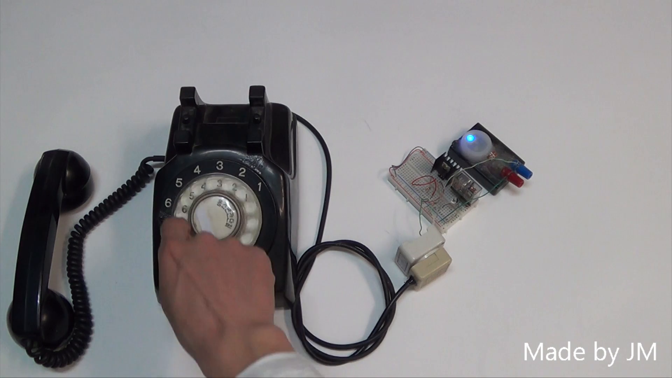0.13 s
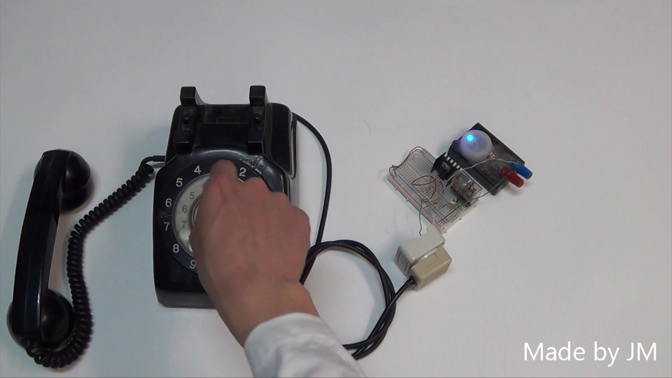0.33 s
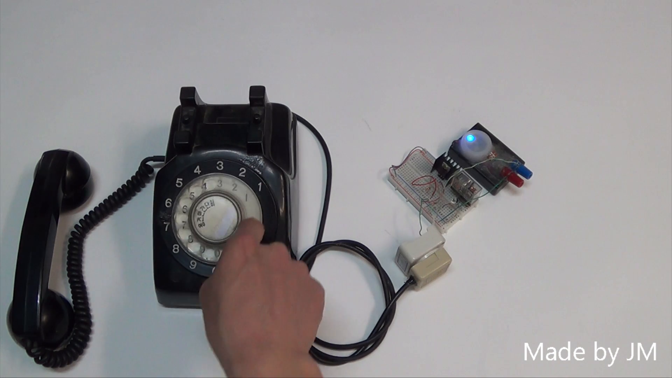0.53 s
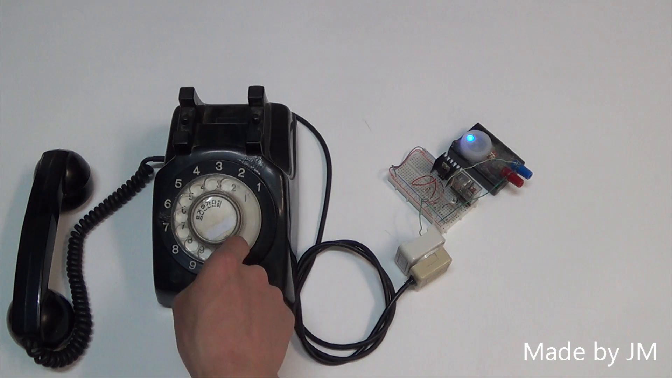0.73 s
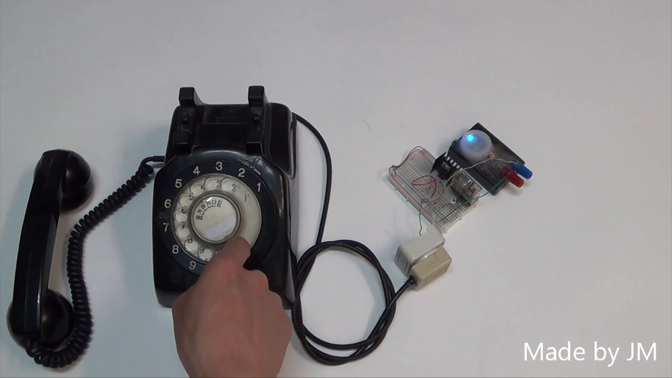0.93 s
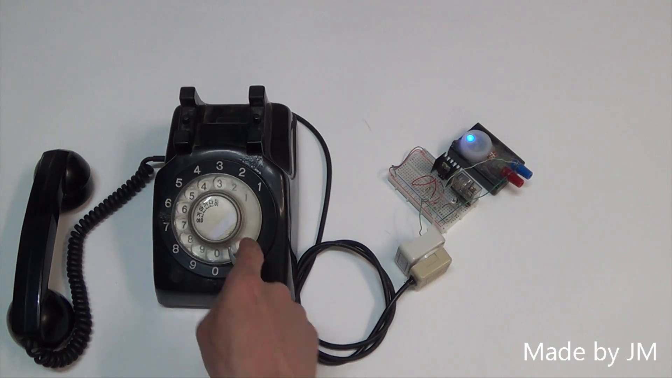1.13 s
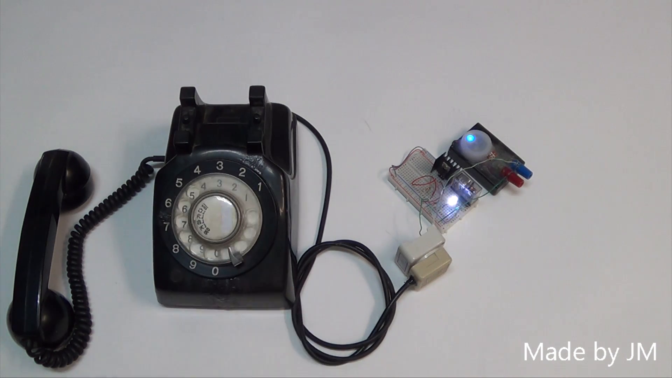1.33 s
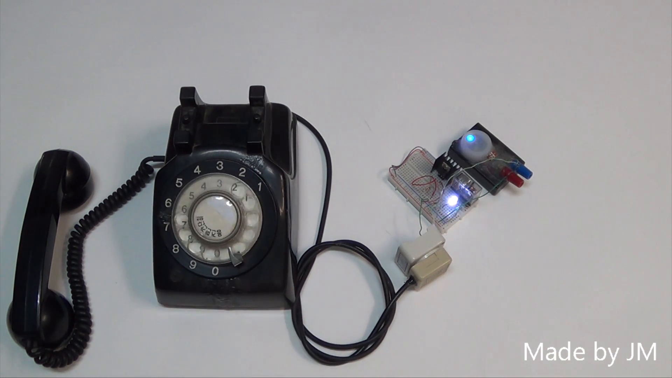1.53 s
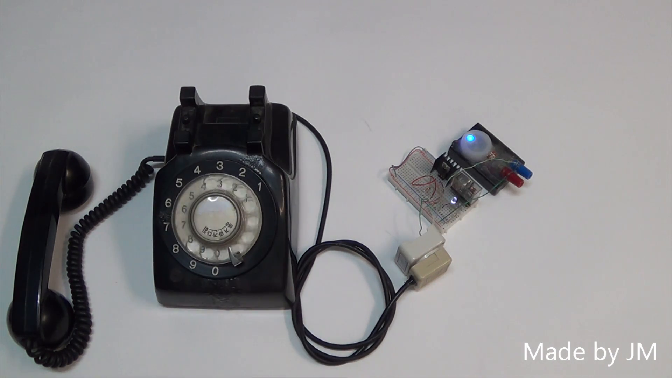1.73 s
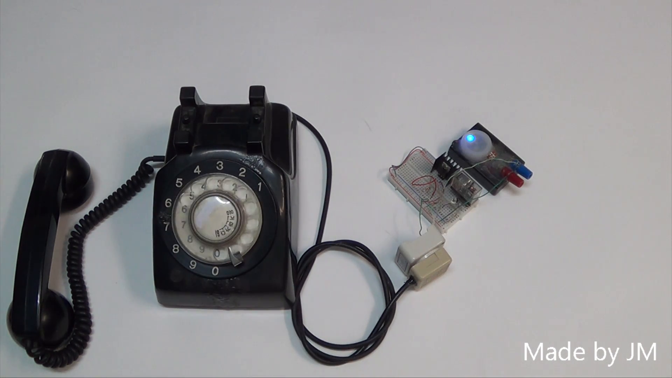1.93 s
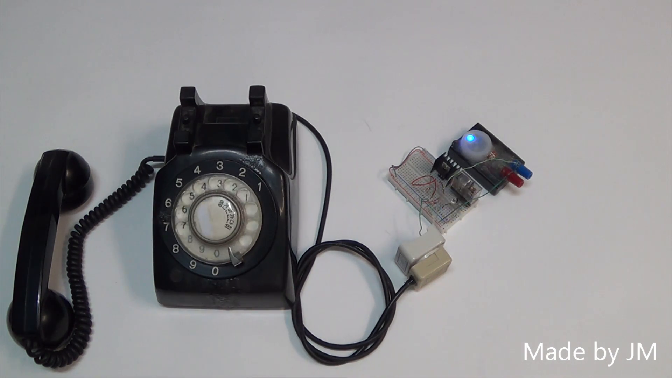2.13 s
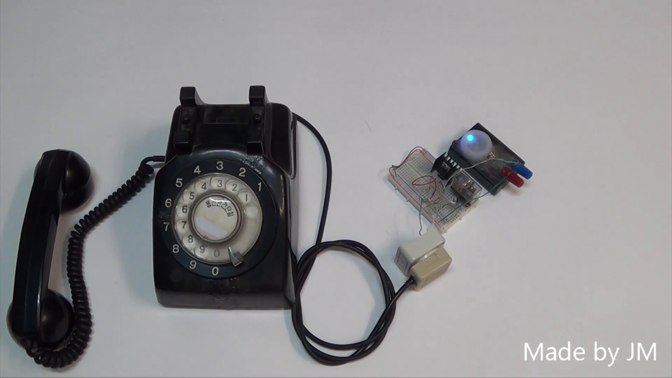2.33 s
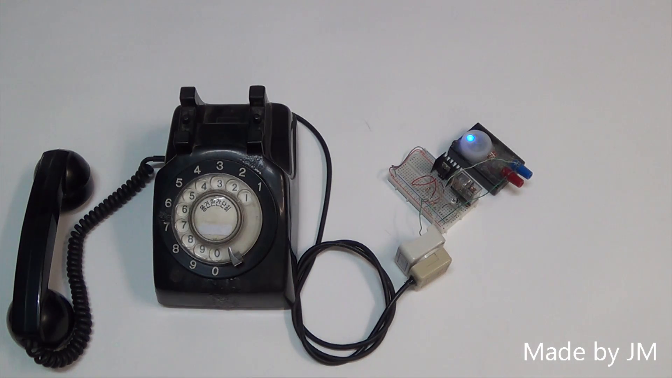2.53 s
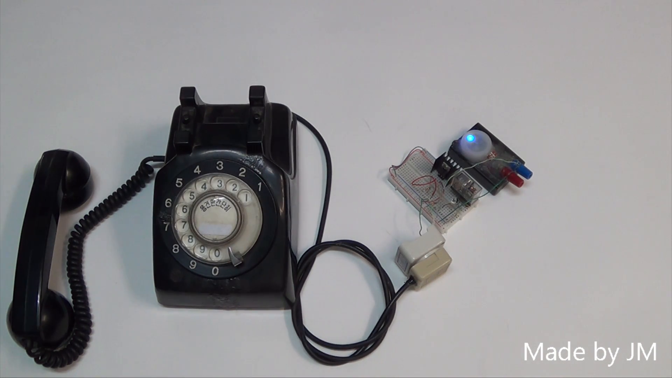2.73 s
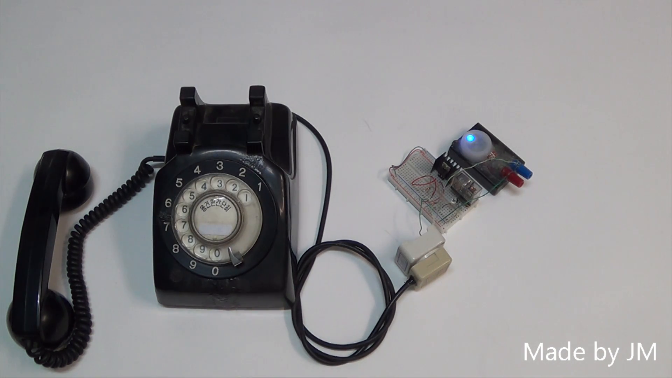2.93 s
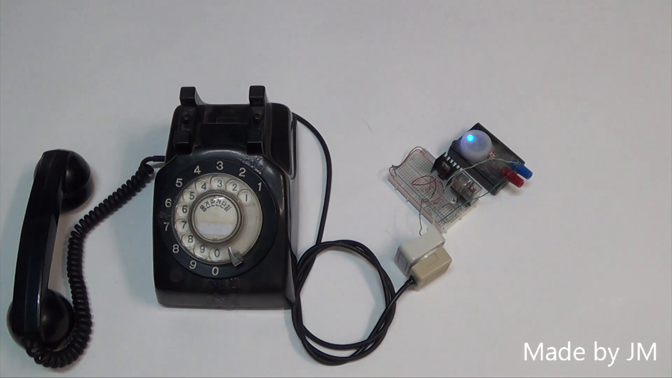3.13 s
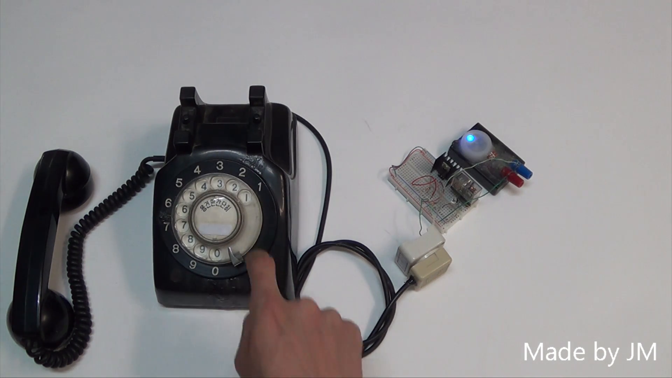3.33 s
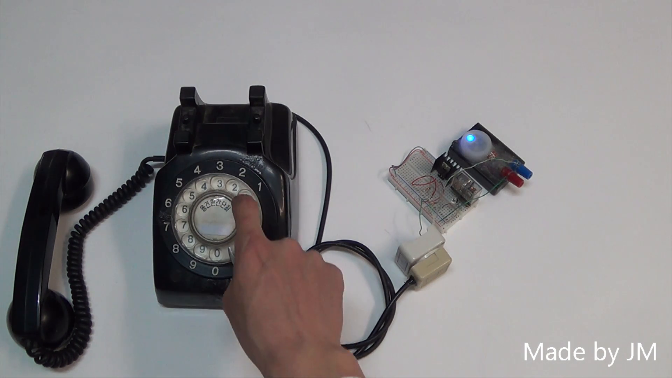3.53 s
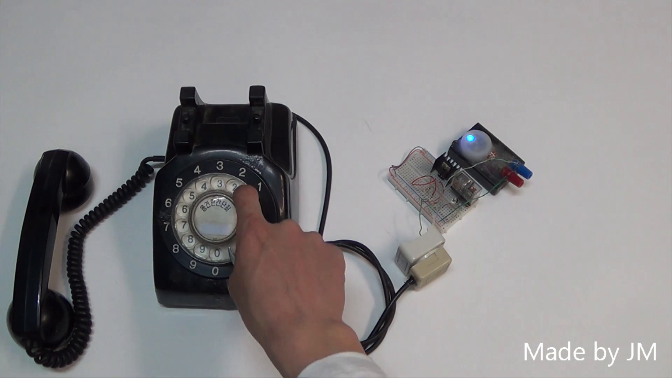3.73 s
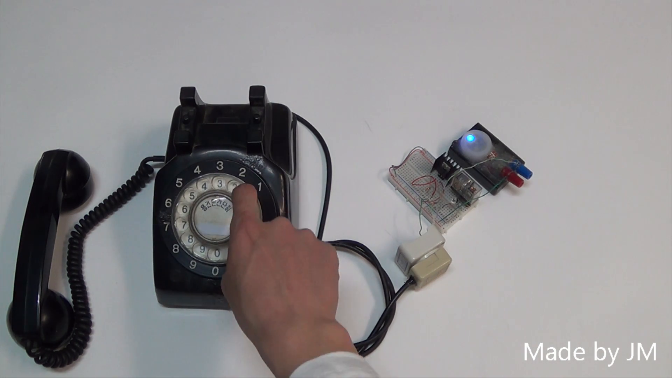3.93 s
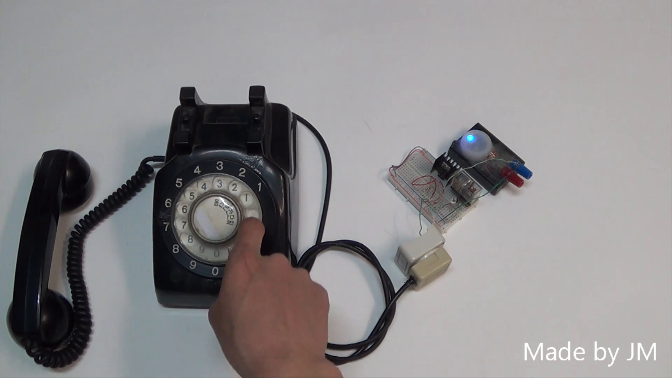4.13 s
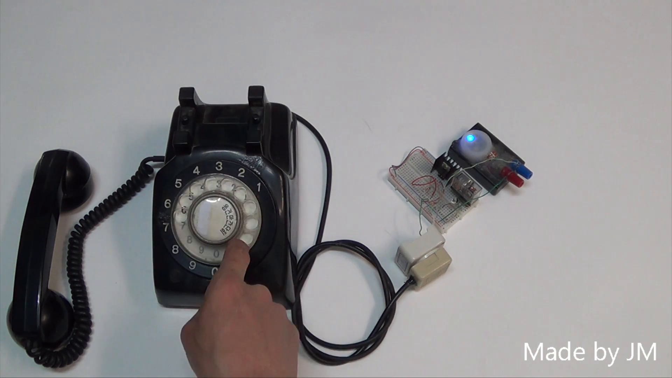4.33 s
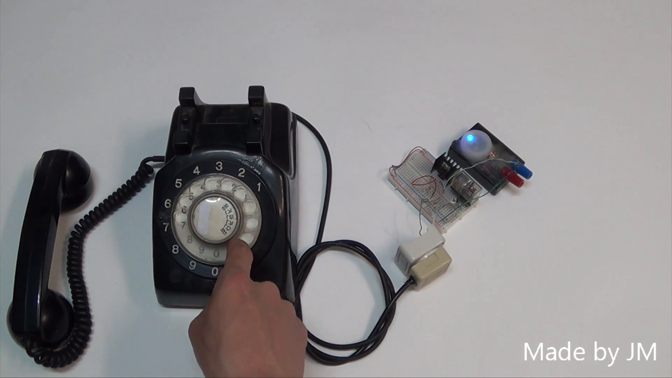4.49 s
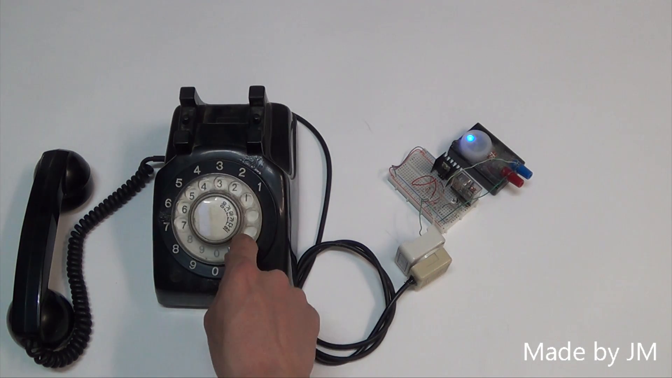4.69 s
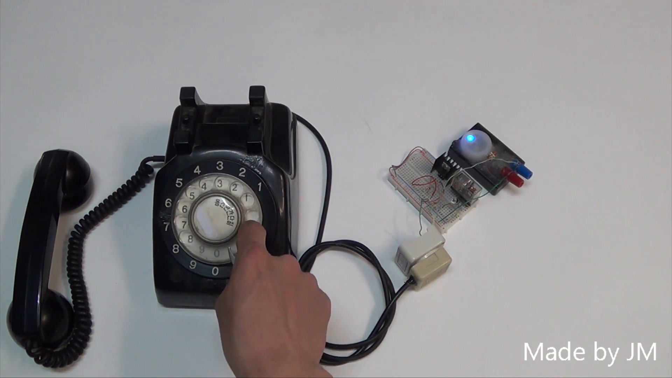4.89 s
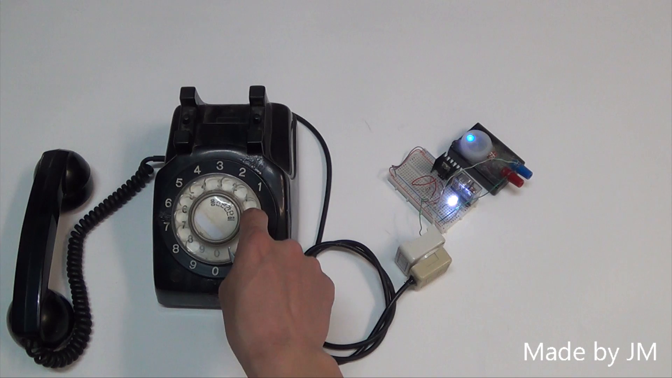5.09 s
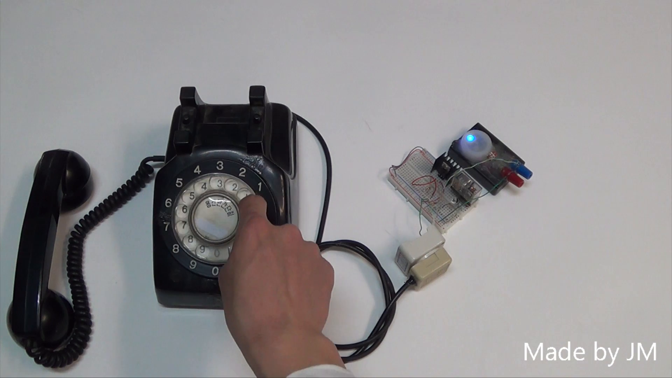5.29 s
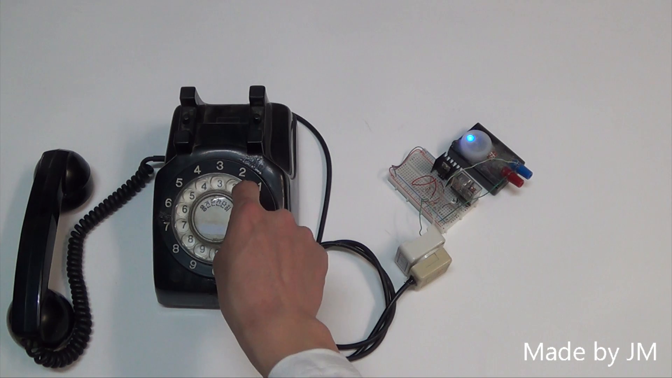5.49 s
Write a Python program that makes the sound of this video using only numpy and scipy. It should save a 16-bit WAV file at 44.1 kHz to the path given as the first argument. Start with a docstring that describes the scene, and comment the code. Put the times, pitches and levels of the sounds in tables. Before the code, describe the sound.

Close above a table in a still, softly hissing room, an old telephone dial is rubbed and ratcheted round with small knocks and skin chirps. It runs back by itself with grainy gear chatter, a faint singing hum and ten crisp pairs of clicks, ending in a hard rattling clack. Near-silence follows, then a lighter short wind and a faint, slow, finger-held return.

```python
"""First a finger rubs the dial round, springs hissing and the ratchet ticking, in a small quiet room.
Let go, a rotary telephone's dial whirrs home through ten pairs of contact clicks and slaps its end stop.
Then it is wound a short way and eased back under the finger. Microphone close above the table.
Rubs and gears are random grains, blows are decaying noise, both coloured by resonances of the works;
squeaks, hum and after-ring are fluttering sines. Reflections and steady room air lie around them."""
import sys
import numpy as np
from scipy import signal
from scipy.fft import rfft, irfft
from scipy.io import wavfile

SR = 44100
rng = np.random.default_rng(int(sys.argv[2]) if len(sys.argv) > 2 else 0)


def master(y):
    """Save y as 16-bit WAV."""
    cut = np.clip(np.atleast_2d(y).T, -1, 1)
    pcm = np.round(cut * 32767)  # scale
    wavfile.write(sys.argv[1], SR, pcm.astype(np.int16))


N = 244755
TIME = np.arange(N) / SR  # s
RELEASE_S, HOME_S = 1.165, 2.52  # the gears run from release until the wheel is home

# resonances of the plastic case, standing out of a broad colour: f/Hz, width/Hz, level/dB
CASE_MODES = [(282, 8.3, 14.5), (445, 37, 4.5), (560.8, 17.4, 10.5), (627, 20, 6.5), (681, 22, 7.5),
              (847, 11.7, 7.5), (1133, 30, 7), (1275, 55, 7), (1613, 80, 10.5), (1950, 45, 8),
              (2324, 160, 7.5), (2597, 190, 7), (2744, 74, 4), (3080, 47, 0), (4580, 110, 6.5),
              (4970, 58, 8.5), (5590, 150, 11), (6180, 110, 10), (8440, 250, 8), (10500, 330, 0),
              (11440, 87, 4), (12100, 97, 7), (13300, 200, -4)]


def amp(db):
    """Decibels to a linear gain."""
    return 10 ** (np.asarray(db) / 20)


def evened(x):
    """Scales a sound to an RMS of one."""
    return x / np.sqrt(np.mean(x ** 2) + 1e-20)


def read(points, hz):
    """Joins points by straight lines on a log-frequency axis."""
    f, value = np.transpose(points)
    return np.interp(np.log(hz + 1), np.log(f + 1), value)


def swell(s, db):
    """A level curve as a gain, silent outside its span."""
    return amp(np.interp(TIME, s, db, left=-200, right=-200))


def arches(rows, fullness=1.):
    """Bouts that each swell and fade in one arch, as a gain."""
    out = np.zeros(N)
    for s, length, db in rows:
        arch = np.hanning(max(round(length * SR), 3)) ** (fullness / 2)
        add(out, s, amp(db) * arch)
    return out


def add(mix, s, sound):
    """Lays a sound into the mix, starting at s seconds."""
    part = mix[round(s * SR):][:len(sound)]
    part += sound[:len(part)]


def dying(t, t60):
    """An envelope that starts at t = 0 and falls 60 dB in t60."""
    return (t >= 0) * np.exp(-np.log(1000) * np.maximum(t, 0) / t60)


def colour(x, spectrum, modes=(), size=8192):
    """Causal filter: a broad spectrum with resonances standing out of it."""
    hz = np.fft.rfftfreq(size, 1 / SR)
    peaks = 1 + sum((amp(db) ** 2 - 1) / (1 + (2 * (hz - f) / w) ** 2) for f, w, db in modes)
    log_gain = np.log(amp(read(spectrum, hz))) + np.log(np.maximum(peaks, .1)) / 2
    # minimum phase, from the Hilbert transform of the log gain
    circle = np.r_[log_gain, log_gain[-2:0:-1]]
    minimum_phase = np.exp(np.conj(signal.hilbert(circle)))
    response = np.fft.ifft(minimum_phase).real[:size // 2]
    return signal.oaconvolve(x, response)[:len(x)]


def grains(per_s, spread_db, t60=.012, size=2048):
    """Random tiny impacts of uneven size, each scattered into a short burst inside the works."""
    sizes = amp(spread_db * np.minimum(rng.exponential(1, N), 4))
    hits = sizes * (rng.random(N) < per_s / SR)
    burst = dying(np.arange(size) / SR, t60)
    power = signal.oaconvolve(hits ** 2, burst ** 2)[:N]
    return evened(np.sqrt(abs(power)) * rng.choice([-1, 1], N))


def tone(hz, rough, flutter_hz=30):
    """A sine whose strength and phase flutter."""
    low_pass = signal.butter(2, flutter_hz, fs=SR, output="sos")
    flutter = signal.sosfilt(low_pass, rng.standard_normal((2, N)))
    a, b = rough * evened(flutter)
    phase = 2 * np.pi * np.cumsum(hz * np.ones(N)) / SR
    return evened((1 + a) * np.sin(phase) + b * np.cos(phase))


def air():
    """Steady room noise and microphone hiss, with a thin high whine."""
    # shape of the still room's noise: f/Hz, level/dB per Hz (relative)
    air_shape = [(15, -44), (25, -10), (60, -6), (120, -8.5), (161, -6.5), (270, -7.5), (427, -8),
                 (624, -8), (796, -10), (1700, -13), (3160, -15.5), (3430, -17), (11600, -23),
                 (16000, -25.5)]
    # likeness of left and right, held between 0 and 1 below: f/Hz, likeness
    air_same = [(60, 1), (130, 0.87), (290, 0.82), (640, 0.14), (1410, -0.02), (3100, 0.26), (6820, 0.9),
                (15000, 1.0)]
    air_db, whine_hz, whine_db = -68.5, 15735, -87.5
    hz = np.fft.rfftfreq(N, 1 / SR)
    a, b = rfft(rng.standard_normal((2, N)))
    same = np.clip(read(air_same, hz), 0, 1)
    left_right = np.array([a, same * a + np.sqrt(1 - same ** 2) * b])
    noise = evened(irfft(left_right * amp(read(air_shape, hz)), N))
    whine = tone(whine_hz, rough=1.3, flutter_hz=12)
    return amp(air_db) * noise + amp(whine_db) * whine


def winding(rub_db=-2.0, hiss_db=-.8):
    """The turning wheel rubs on the case while the return spring's coils slide."""
    # one curve for each stroke, before the two trims: t/s, rub level/dB, spring hiss level/dB
    winds = [
        [(.03, -70, -82), (.075, -52.5, -55.5), (.15, -55, -60), (.21, -49.5, -49), (.275, -45.5, -48.5),
         (.36, -54, -60), (.44, -54, -60), (.53, -49.5, -48), (.635, -54.5, -61), (.73, -49, -57),
         (.77, -65, -83)],
        [(3.98, -66, -75), (4.03, -61.5, -64.5), (4.11, -59, -61.5), (4.16, -49, -60), (4.2, -63, -69),
         (4.27, -58.5, -66), (4.39, -56, -61), (4.44, -88, -91)],
        [(4.7, -79, -93), (4.79, -63.5, -87), (4.9, -70, -86), (5.01, -63.5, -82), (5.2, -71, -92),
         (5.29, -68, -88), (5.34, -63, -63), (5.42, -65, -84), (5.55, -60.5, -76)],
    ]
    # broad colours of rub and hiss: f/Hz, level/dB
    rub_colour = [(120, -36), (260, -12.5), (380, -5.5), (520, 0.5), (750, 0), (1200, 2.5), (1420, -6),
                  (1650, -2.5), (2600, -11.5), (3800, -7), (5500, -36.5), (7000, -20), (16000, -42)]
    hiss_colour = [(2000, -13.5), (5500, -11.5), (6900, -18.5), (8700, -9.5), (11000, -2), (12800, -9.5),
                   (13800, -6.5), (14700, -28), (15500, -40)]
    rub = evened(colour(grains(900, 2.7, t60=0.022), rub_colour, CASE_MODES))
    hiss = evened(colour(grains(1500, 3.1, t60=0.02), hiss_colour, CASE_MODES))
    out = np.zeros(N)
    for rows in winds:
        s, low_db, high_db = np.transpose(rows)
        out += rub * swell(s, low_db + rub_db)
        out += hiss * swell(s, high_db + hiss_db)
    return out


def knocks(rows, spectrum, modes, gain_db, tick_db, body_t60, rim_t60, tick_t60, rise_s, size=4096):
    """Each blow rings the metal works shortest, the wheel's rim briefly, and the case long and low."""
    t, out = np.arange(size) / SR, np.zeros(N)
    bands = [(6000, 17000), (150, 1400), (1500, 6000)]  # tick, body, rim (Hz)
    filters = [signal.butter(4, band, "band", fs=SR, output="sos") for band in bands]
    ring_times = (tick_t60, body_t60, rim_t60)
    for s, tick, body, rim, ring in rows:
        levels = (tick + tick_db, body, rim)
        for sos, db, t60 in zip(filters, levels, ring_times):
            envelope = dying(t, t60 * max(ring, .2)) * (1 - dying(t, rise_s))
            blow = rng.choice([-1, 1], size) * envelope
            ringing = signal.sosfilt(sos, colour(blow, spectrum, modes))
            add(out, s, amp(db + gain_db) * evened(ringing))
    return out


def wheel():
    """Pawl on ratchet, finger against wheel and stop, and wheel on end stop, all as blows."""
    # the pawl drops over a ratchet tooth during winding, before the gains below: t/s, level/dB
    ratchet = [(.178, -32), (.2209, -30.5), (.2543, -27), (.2862, -30.5), (.3277, -33), (.3885, -32),
               (.4464, -32), (.5008, -31.5), (.5407, -33.5), (.5826, -32), (.6459, -33.5), (4.1984, -34),
               (4.2926, -31.5)]
    # finger knocks wheel, or wheel the finger stop, before the gains below:
    # t/s, tick level/dB, body level/dB, rim level/dB, factor on the ring time
    bumps = [(.2618, -29, -42, -41, .85), (.6848, -31, -39.5, -45, .55), (.7118, -27.5, -47, -46.5, .75),
             (.9772, -58.5, -80, -65, .75), (1.07, -44, -60, -46.5, .5), (1.1303, -40.5, -47.5, -52, .7),
             (1.1772, -35, -37.5, -43.5, 1), (1.1877, -36.5, -42.5, -47, .9), (2.4314, -45, -44, -43.5, .7),
             (2.6364, -59, -57.5, -63, 1), (2.6599, -54, -64, -58, 1), (3.7643, -57, -49.5, -49, 1),
             (3.9719, -40, -55, -51.5, 1), (4.136, -41, -52.5, -51, 1), (4.151, -39, -42, -47, .9),
             (4.2404, -52, -48, -49, .8), (4.345, -28, -42, -42, .85), (4.375, -30, -42.5, -51, .7),
             (4.3894, -43, -56.5, -50, 1), (4.566, -58, -71, -70, .85), (4.9506, -54, -59, -58, .7),
             (5.0559, -55, -62, -49, .9), (5.1234, -44, -59.5, -60, 1), (5.3433, -38, -56.5, -52, 1),
             (5.3777, -47.5, -55, -55, 1), (5.5064, -68, -55.5, -60, 1)]
    # the wheel slaps its end stop and rattles: same columns, also before the gains
    slap_blows = [(2.5083, -28.5, -37.5, -27, 1.1), (2.5113, -26.5, -40.5, -31, 0.69),
                  (2.5133, -22.5, -41.5, -33.5, 0.62), (2.5155, -20, -32, -39, .9),
                  (2.5238, -27.5, -39, -46, 1.4), (2.5455, -34.5, -43, -49.5, 1.0),
                  (2.551, -30, -49, -57, 1.0), (2.565, -44, -49.5, -67, 0.91)]
    # broad colours of knock and slap: f/Hz, level/dB
    knock_colour = [(120, -58), (260, -14.5), (500, -3.5), (1200, -10), (1420, -4), (1650, -6), (2700, -5),
                    (3900, -7.5), (6800, -16.5), (8500, -8), (11000, -3), (13000, -12), (14500, -21),
                    (16000, -49)]
    slap_colour = [(120, -37.5), (260, -9.5), (560, 5), (1000, 2), (1460, -6), (2700, -2), (3800, -11),
                   (6900, -14.5), (8500, -8.5), (11000, -4), (13000, -14), (14700, -17), (16000, -40)]
    # end stop and wheel together: f/Hz, width/Hz, level/dB over the colour
    slap_modes = [(281, 38, 9), (550, 13, 9.5), (628, 30, 10), (830, 34, 3.5), (1267, 49, 10.5),
                  (1700, 50, 11), (2338, 113.4, 13), (2770, 130, 1), (2860, 130, 7), (2944, 70, 7),
                  (3260, 80, 10), (4490, 95, 12.5), (8400, 140, 8.5), (10700, 220, 3), (11460, 200, 7),
                  (13200, 250, 10)]
    pawl_body_db, pawl_rim_db = -21, -21  # what case and rim take up of each tick
    teeth = [(s, db, db + pawl_body_db, db + pawl_rim_db, 1) for s, db in ratchet]
    ticking = knocks(teeth, knock_colour, CASE_MODES, gain_db=-13.0, tick_db=-11,
                     body_t60=0.066, rim_t60=0.047, tick_t60=0.027, rise_s=0.004)
    bumping = knocks(bumps, knock_colour, CASE_MODES, gain_db=-13.0, tick_db=-11,
                     body_t60=0.071, rim_t60=0.051, tick_t60=0.027, rise_s=0.004)
    slapping = knocks(slap_blows, slap_colour, slap_modes, gain_db=-13, tick_db=-11.0,
                      body_t60=0.039, rim_t60=0.023, tick_t60=0.016, rise_s=0.00069)
    return ticking + bumping + slapping


def squeaks(pitch_hz=2270, chirp_db=-3, scrape_db=-5):
    """Short slips of skin on plastic chirp and nudge the case."""
    # fingertip sticking and slipping on the wheel, before the two trims: t/s, level/dB, length/s
    slips = [(.1895, -39, .005), (.824, -44, .013), (.8375, -42, .005), (.858, -51, .009),
             (.8675, -38.5, .005), (.8765, -38, .005), (1.076, -50, .016), (1.089, -48, .018)]
    # broad colour of the scrape: f/Hz, level/dB
    slip_colour = [(150, -20), (340, -6.5), (430, -9), (700, 3), (1000, -1), (1300, -14), (1600, -8),
                   (2500, -2), (3600, -16), (5500, -21), (10000, -25), (15000, -30)]
    grip = np.zeros(N)
    for s, db, length in slips:
        add(grip, s, amp(db) * np.hanning(round(length * SR)))
    scrape = evened(colour(grip * rng.standard_normal(N), slip_colour, CASE_MODES)) * np.std(grip)
    chirp = grip * tone(pitch_hz, rough=0.24, flutter_hz=400)
    return amp(chirp_db) * chirp + amp(scrape_db) * scrape


def creep():
    """The pressed fingertip drags along the finger stop with a dull groan of grains."""
    # bouts of creeping: start t/s, length/s, level/dB
    creeps = [(.76, .075, -65), (.82, .085, -56), (1.075, .05, -60), (1.15, .04, -54)]
    # broad colour of the groan: f/Hz, level/dB
    creep_colour = [(150, -25), (340, -6), (430, -8), (700, 3), (1050, -1), (1300, -16), (2500, -16),
                    (5000, -35), (15000, -50)]
    groan = evened(colour(grains(700, 2.2, t60=.015), creep_colour, CASE_MODES))
    return groan * arches(creeps, fullness=.8)


def spin():
    """The free dial picks up speed, runs steadily and dies away quickly once home, as a gain."""
    spin_up_s, run_down_t60 = .04, .115  # time constant, and time to fall 60 dB (s)
    speeding_up = 1 - dying(np.maximum(TIME - RELEASE_S, 0), spin_up_s * np.log(1000))
    return speeding_up * dying(np.maximum(TIME - HOME_S, 0), run_down_t60)


def gears(turn_hz=37.3, throb=0.1):
    """Gear teeth chatter into the case, throbbing with each turn of the governor."""
    # broad colour of the whirr: f/Hz, level/dB
    gear_colour = [(120, -23.5), (260, -12.5), (430, -1.5), (560, -1.5), (720, 1.5), (1050, 4), (1250, -4),
                   (1420, -6.5), (1560, -7), (2600, -9), (3300, -8), (4400, -15.5), (5700, -19),
                   (6800, -20.5), (11000, -15.5), (15000, -34)]
    # the wheel chatters when it moves near its home position: start t/s, length/s, level/dB
    chatter_bouts = [(2.425, .02, -45), (2.455, .045, -50), (3.99, .19, -62.5), (5.35, .14, -69)]
    # resonances of that chatter: f/Hz, width/Hz, level/dB
    chatter_modes = [(2295, 120, 14.5), (2730, 130, 18.5), (3960, 220, 22), (5560, 300, 8)]
    chatter_colour = [(800, -47), (2400, 22.5), (6000, -16), (12000, 6)]  # f/Hz, level/dB
    gear_db, growth_db_per_s = -47.6, .7  # level at release, and its rise
    teeth = grains(900, 2.0, t60=0.018) * (1 + throb * np.sin(2 * np.pi * turn_hz * TIME))
    run_gain = spin() * amp(gear_db + growth_db_per_s * (TIME - RELEASE_S))
    whirr = evened(colour(teeth, gear_colour, CASE_MODES)) * run_gain
    chatter = evened(colour(teeth, chatter_colour, chatter_modes))
    return whirr + chatter * arches(chatter_bouts, fullness=.6)


def governor():
    """The friction brake hums near a case mode as the dial runs home, and now and then sings out."""
    # the brake catches and sings: start t/s, length/s, level/dB
    catches = [(1.26, .1, -55), (1.91, .14, -47.5), (2.085, .19, -44), (2.29, .06, -46.5), (2.38, .06, -50)]
    hum_hz, hum_db = 561, -59.5
    gain = amp(hum_db) * spin() + arches(catches, fullness=.6)
    return tone(hum_hz, rough=0.18) * gain


def snaps(rows, blows, spectrum, modes, gain_db, vary, size=3000):
    """A contact spring strikes and bounces in nearly the same way each time."""
    t, out = np.arange(size) / SR, np.zeros(N)
    envelope = np.sqrt(sum((amp(db) * dying(t - delay, t60)) ** 2 for delay, db, t60 in blows))
    habit = rng.standard_normal(size)  # the part that every snap shares
    for _ in range(3):  # a hard blow drives all frequencies alike
        z = rfft(habit * envelope)
        flat = irfft(z / (abs(z) + 1e-12), size)
        unshaped = flat / (envelope + 0.03) * (envelope > .01)
        habit = evened(np.tanh(evened(unshaped)))
    for s, db in rows:
        strike = (habit + vary * rng.standard_normal(size)) * envelope
        snap = colour(strike, spectrum, modes)
        add(out, s, amp(db + gain_db) * evened(snap))
    return out


def contacts():
    """A spring contact snaps open and shut for every pulse of the digit, and for one slow pulse."""
    # blows within one snap, opening and closing: delay t/s, level/dB, t60/s
    open_blows = [(0.0008, 1.5, 0.022), (.0033, -2.5, .022), (.0071, -4.5, .016)]
    shut_blows = [(0.0007, 0, 0.021), (.009, -8, .035)]
    # broad colours of opening and closing: f/Hz, level/dB
    open_colour = [(250, -31), (600, -28), (2500, -14.5), (4200, -12), (5500, -4.5), (6800, -8), (9000, -4),
                   (11000, -0.5), (12000, -12), (13500, 1), (14700, -5), (16000, -29.5)]
    shut_colour = [(250, -19), (600, -23), (2500, -10.5), (4200, -11), (5700, -11), (6850, -20),
                   (8200, -5.5), (9400, -4), (11000, -3), (12600, -0.5), (13400, -19), (14500, -0.5),
                   (16300, -35)]
    # resonances of the opening spring and closing contact: f/Hz, width/Hz, level/dB over the colour
    spring_modes = [(2770, 49, 13.5), (5620, 280, 8.5), (7570, 90, 13.5), (7900, 130, 17), (9740, 140, 13),
                    (9400, 83, 6), (10700, 120, 18.5), (11330, 120, 13.5), (11080, 130, 17.5),
                    (12980, 200, 19), (12300, 130, 15), (14200, 150, 9), (14400, 130, 5)]
    shut_modes = [(3360, 93, 8), (4960, 190, 10), (6310, 130, 16.5), (7000, 230, 13), (9900, 270, 6),
                  (10750, 150, -1), (12900, 280, 1)]
    # one slow pulse as the dial is eased back, before the gains below: t/s, level/dB
    slow_open = (5.0981, -27)
    slow_shut = (5.3194, -31)
    # the governor holds a steady pace: open once a period, shut about half a period later
    first_pulse_s, period_s, open_for_s, digit_pulses = 1.3782, .10707, .0531, 10
    # first pulse before the gains below, and the rise from one pulse to the next
    open_db, shut_db, growth_db = -23.8, -27.1, .19
    # the cam's two lobes differ: every other closing is later and harder
    lobe_s, lobe_db = .0004, .8
    pulse = np.arange(digit_pulses)
    open_s = first_pulse_s + period_s * pulse
    growth = growth_db * pulse
    lobe = -(-1) ** pulse
    shut_s = open_s + open_for_s + lobe_s * lobe
    opens = [*zip(open_s, open_db + growth), slow_open]
    shuts = [*zip(shut_s, shut_db + growth + lobe_db * lobe), slow_shut]
    opening = snaps(opens, open_blows, open_colour, spring_modes, gain_db=-19, vary=0.6)
    closing = snaps(shuts, shut_blows, shut_colour, shut_modes, gain_db=-20, vary=0.37)
    return opening + closing


def after_ring():
    """A faint tone, with a weaker one about an octave up, hangs on at the finger stop."""
    # where it sounds, as the level of the lower tone: start t/s, length/s, level/dB
    rings = [(4.42, .16, -72)]
    pair = tone(937, rough=0.051) + amp(-14) * tone(1870, rough=.2)
    return pair * arches(rings, fullness=1.4)


def room(x, wet_db=-14, side_db=-3, near_db=-19, near_t60=0.009, size=16384):
    """Close reflections from the table differ between left and right; the walls add a short tail."""
    # decay of the walls' tail: f/Hz, t60/s
    room_t60 = [(200, 0.26), (1000, 0.26), (4000, 0.14), (9000, 0.16), (15000, 0.05)]
    # how much left and right differ: f/Hz, level/dB
    side_colour = [(100, -1), (500, -5), (1200, -2), (4000, -1), (8000, -3.5), (15000, -8)]
    hz, t, z = signal.stft(rng.standard_normal((2, size)), SR, nperseg=256)
    fading = z * dying(t, read(room_t60, hz)[:, None])
    tails = signal.istft(fading, SR, nperseg=256)[1][:, :size]
    t = np.arange(size) / SR
    mid, side = amp(wet_db) * evened(tails * np.clip(t / 0.007, 0, 1))  # builds up over 7 ms
    near = amp(near_db) * evened(rng.standard_normal(size) * dying(t, near_t60))
    side = colour(amp(side_db) * side + near, side_colour)
    response = np.array([mid + side, mid - side]) / np.sqrt(size)
    return x + signal.fftconvolve(x[None], response, axes=1)[:, :N]


def scene():
    """The telephone's sounds in the room, over the room's own air."""
    finger = winding() + squeaks() + creep()
    works = wheel() + gears() + governor() + contacts() + after_ring()
    return room(finger + works) + air()


def record(dry):
    """The recorder's band limit."""
    edge_hz = 16500
    low_pass = signal.firwin(511, edge_hz, window=("kaiser", 9), fs=SR)
    return signal.oaconvolve(dry, low_pass[None], "same")


dry = scene()
out = record(dry)
master(out)
```